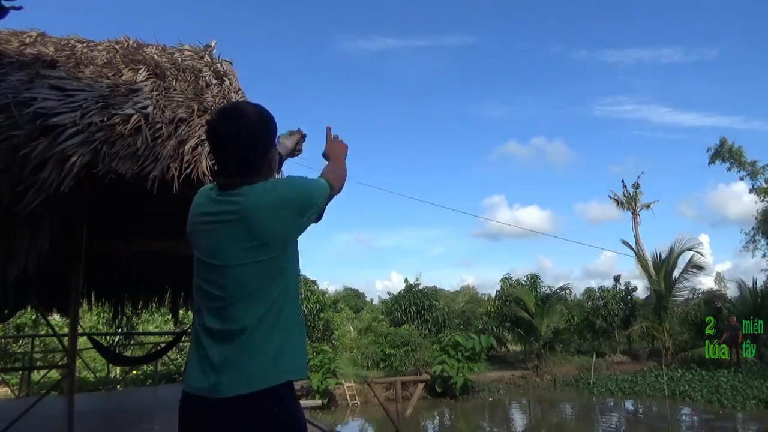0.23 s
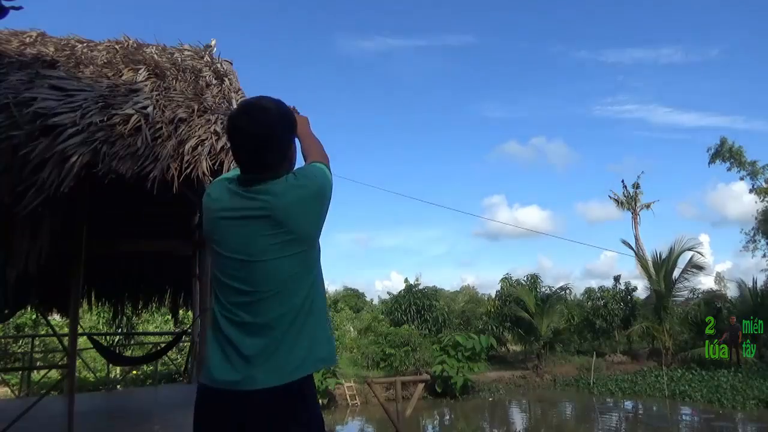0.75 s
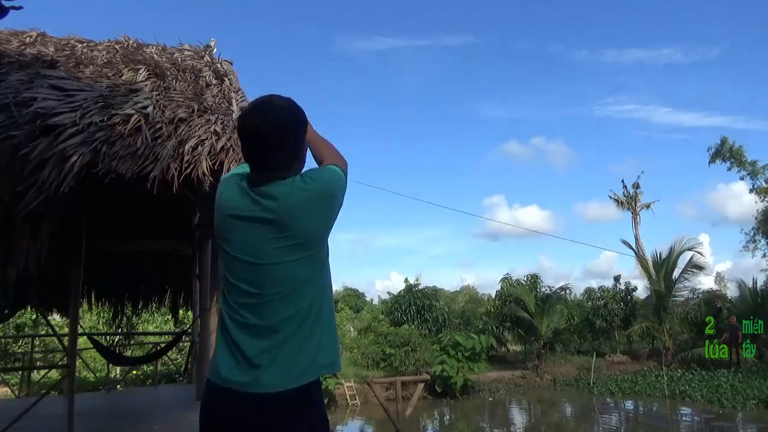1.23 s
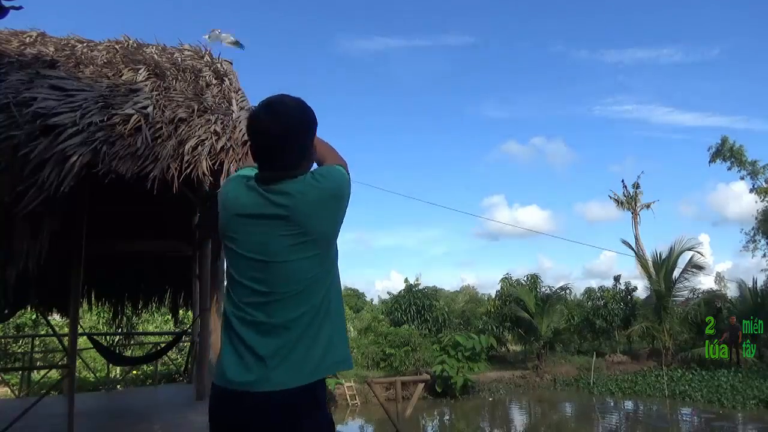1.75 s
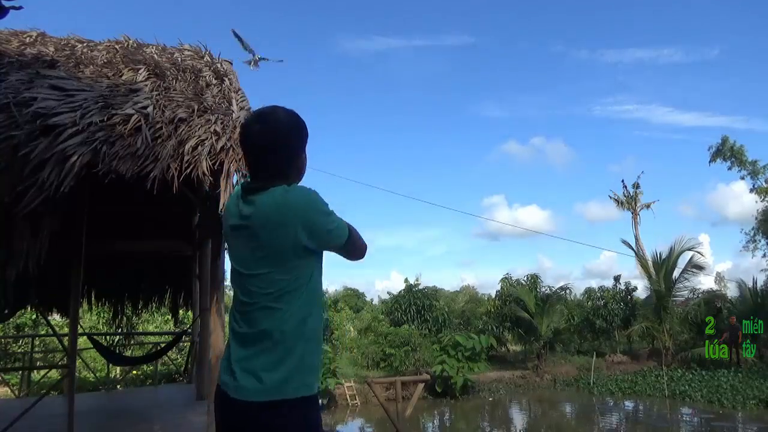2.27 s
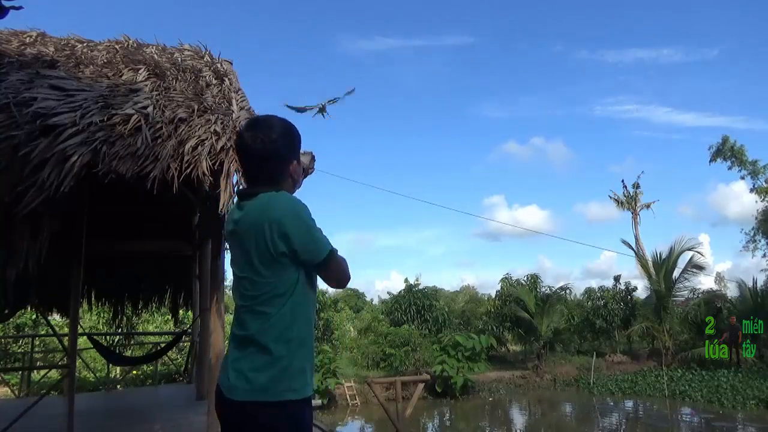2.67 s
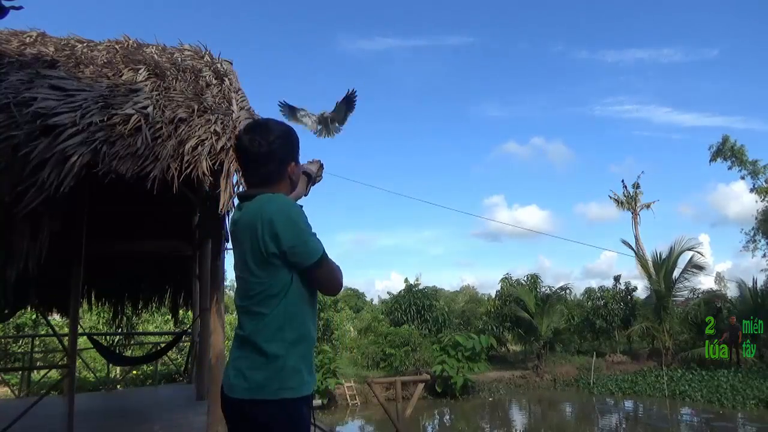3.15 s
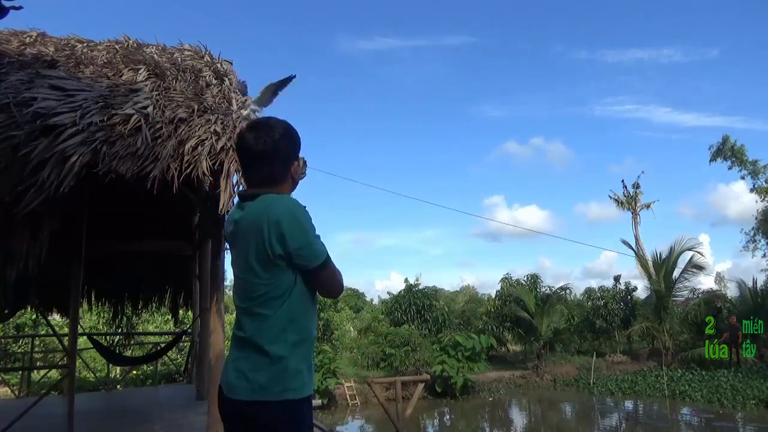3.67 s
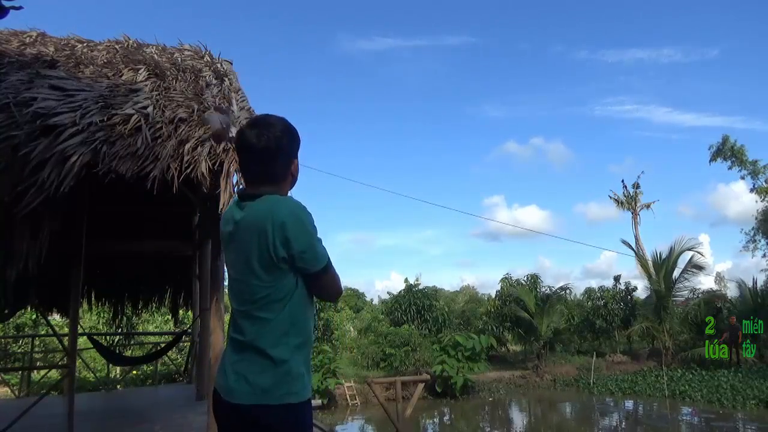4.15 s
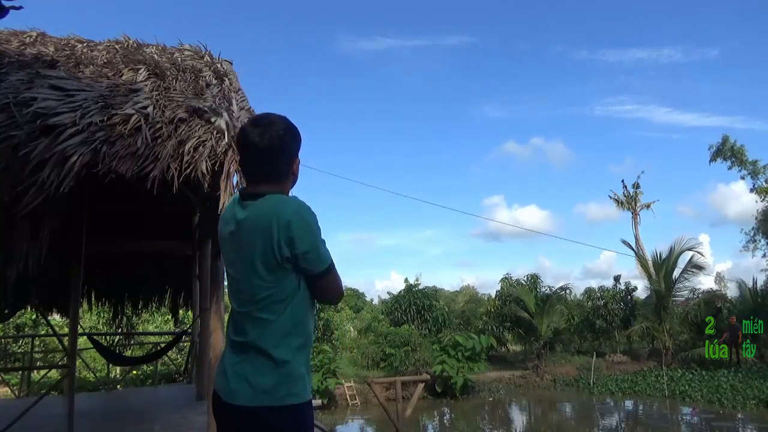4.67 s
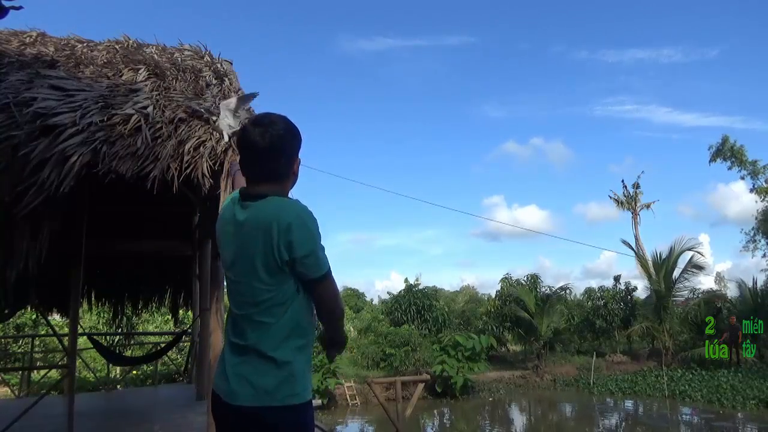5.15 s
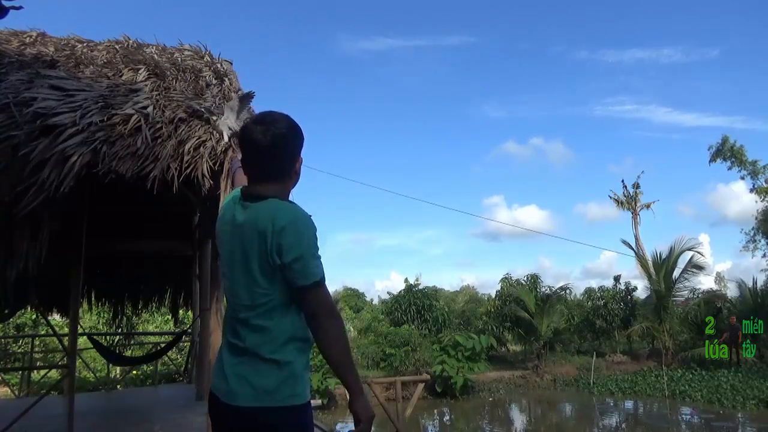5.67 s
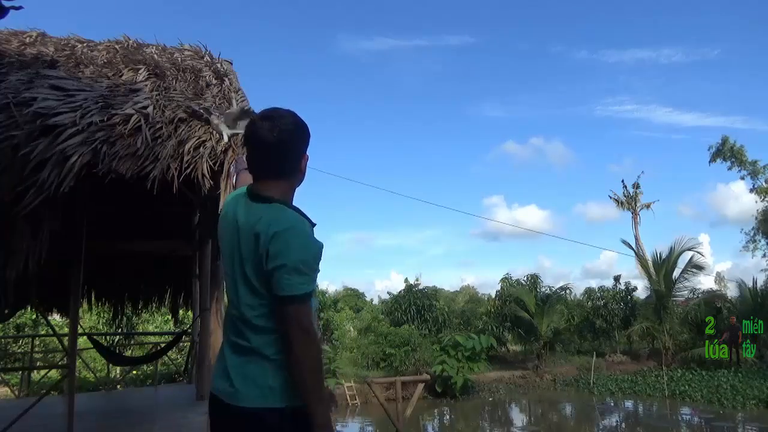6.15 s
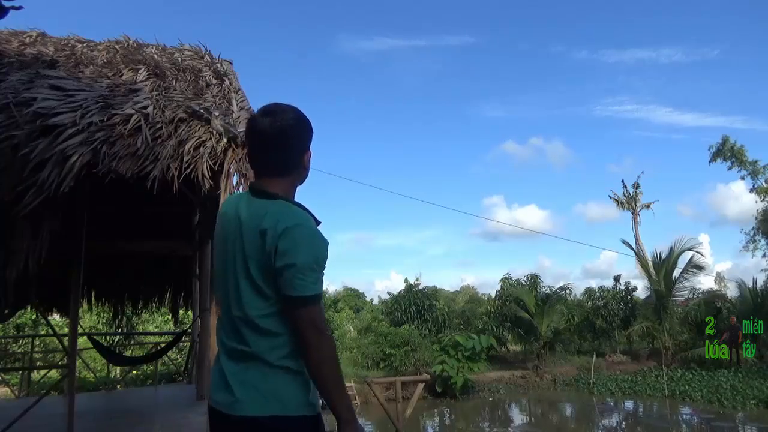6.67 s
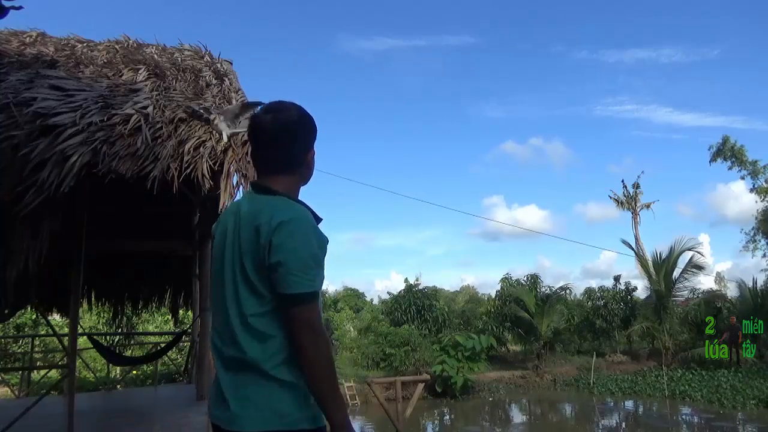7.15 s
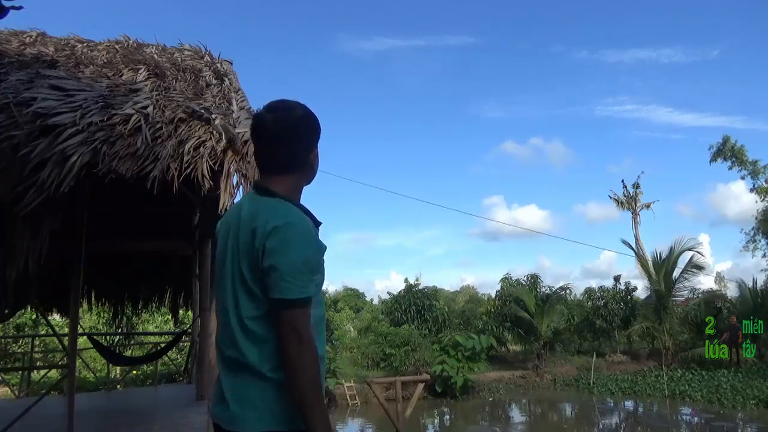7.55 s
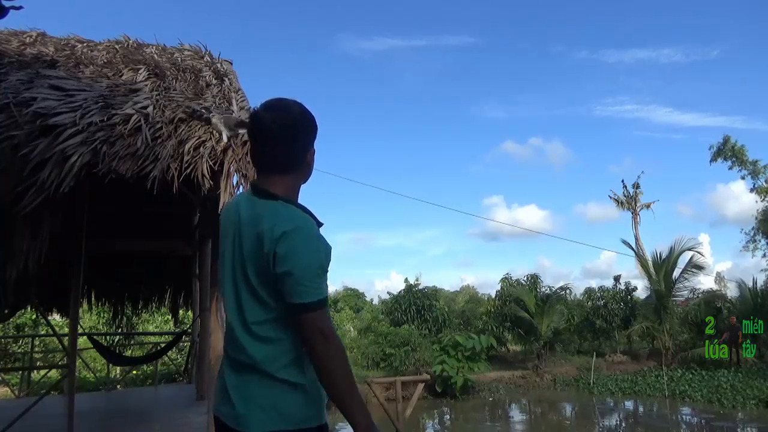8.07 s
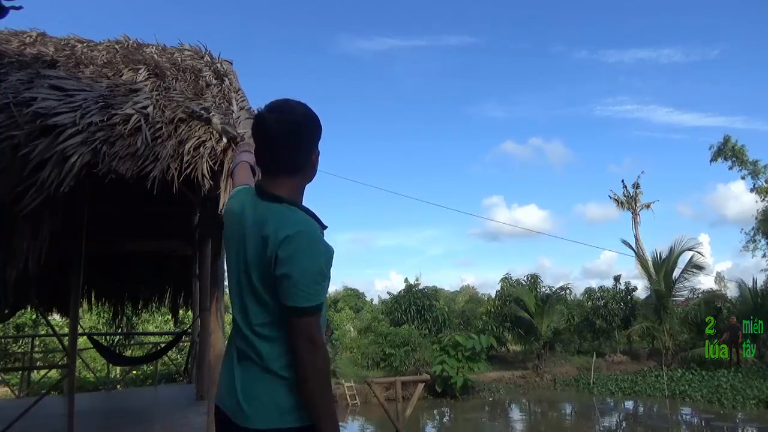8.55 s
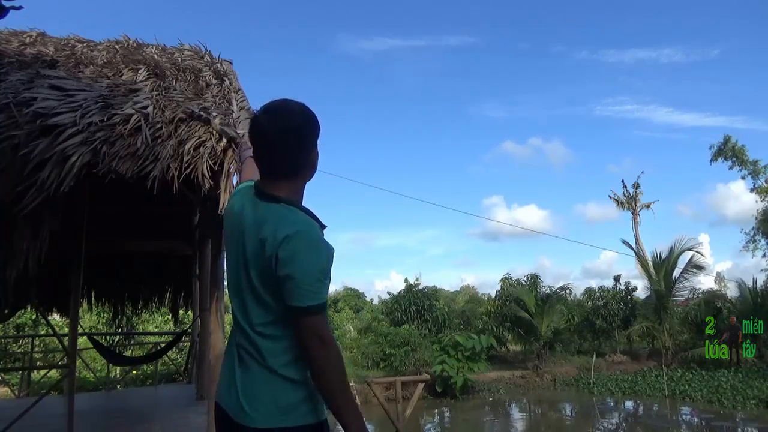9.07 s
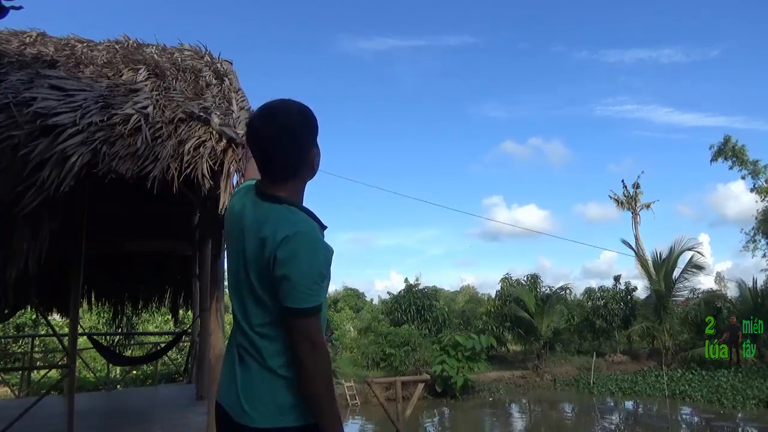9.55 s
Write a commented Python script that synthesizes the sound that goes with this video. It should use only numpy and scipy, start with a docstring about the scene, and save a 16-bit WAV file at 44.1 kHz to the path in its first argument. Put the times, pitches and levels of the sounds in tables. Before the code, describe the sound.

Two young falcons beg outdoors with long rasping screeches and hoarse rising wails, with short rising chirps in between.

```python
"""A harsh screech opens the scene. Two young falcons beg beside a thatched hut by a pond: one's rasping
screeches alternate with the other's hoarse rising wails. Both are turbulent air exciting throat
resonances; each cry scoops up and swells as the beak opens, holds, then bends away. Short rising
whistles, thin peeps and a few taps sound in between. Nearby surfaces and the trees echo them over
quiet open air and the drone of a far motor."""
import sys
import numpy as np
from scipy import signal
from scipy.fft import rfft, irfft, next_fast_len
from scipy.io import wavfile

SR = 44100
rng = np.random.default_rng(int(sys.argv[2]) if len(sys.argv) > 2 else 0)


def int16_out(signal):
    """Quantize to a 16-bit WAV file."""
    q = np.round(np.clip(np.atleast_2d(signal).T, -1, 1) * 32767)
    wavfile.write(sys.argv[1], SR, q.astype(np.int16))


N = 433062
TIME = np.arange(N) / SR


def undb(db):
    """Decibels to amplitude gain."""
    return 10 ** (np.asarray(db) / 20)


def unit(x):
    """Normalisation to rms 1."""
    return x / np.sqrt(np.mean(np.abs(x) ** 2))


def add(out, start, x):
    """Superposition: mix x into out from a start in seconds."""
    i = max(int(start * SR), 0)
    out[i:i + len(x)] += x[:max(len(out) - i, 0)]


def delayed(x, ms):
    """Propagation delay: the same sound, milliseconds later."""
    return np.concatenate([np.zeros(round(ms * SR / 1000)), x])[:len(x)]


def colour(x, points):
    """Spectral shaping by a (Hz, dB) outline."""
    hz, db = np.transpose(points)
    size = next_fast_len(len(x))
    bin_hz = np.maximum(np.fft.rfftfreq(size, 1 / SR), 1)
    gain = undb(np.interp(np.log(bin_hz), np.log(hz), db))
    return irfft(rfft(x, size) * gain, size)[:len(x)]


def flutter(n, hz, order=2):
    """Random fluctuation: complex noise of rms 1, low-passed at hz."""
    lead = SR // 20
    noise = rng.standard_normal((n + lead, 2)) @ np.array([1, 1j])
    lowpass = signal.butter(order, min(hz, SR / 3), fs=SR, output="sos")
    return unit(signal.sosfilt(lowpass, noise)[lead:])


def ring(n, hz, width, order=2):
    """Noise-driven resonance, steady or gliding; its real part has rms 1. Order steepens the skirts."""
    carrier = np.exp(2j * np.pi * np.cumsum(hz * np.ones(n)) / SR)
    return np.sqrt(2) * flutter(n, width / 2, order) * carrier


def sing(n, hz, width):
    """Saturation: a resonance on the edge of self-oscillation limits its swings and holds firmer."""
    swing = ring(n, hz, width)
    return np.sqrt(2) * unit(swing / np.sqrt(1 + np.abs(swing) ** 2))


def blend(tone, breath, share_db):
    """Incoherent addition: a tone and its noisy surround mix at constant power."""
    return (undb(share_db) * tone + breath) / np.sqrt(1 + undb(2 * share_db))


def rattle(n, hz, depth_db):
    """Amplitude modulation: membranes slap irregularly and chop the air stream."""
    return unit(undb(depth_db * flutter(n, hz).real))


# The spectrum of the open air. Each row: frequency in Hz, relative level in dB.
AIR_SPECTRUM = [(15, -33), (25, -12), (121, -13.5), (311, -12.5), (907, -16.5), (1230, -19), (1670, -16),
                (3870, -18.5), (4630, -24.5), (5970, -23), (7900, -27.5), (8970, -20), (11000, -36),
                (14300, -60), (22000, -120)]


def countryside():
    """Ambient noise: broadband air wavers in level over the narrow-band drone of a far motor."""
    mid, side = (unit(colour(rng.standard_normal(N), AIR_SPECTRUM)) for _ in range(2))
    drone = undb(-51) * ring(N, hz=110, width=59).real
    air_db = -50.5 + 3 * flutter(N, hz=6).real
    return undb(air_db) * (mid + undb(-6) * side * np.array([[1], [-1]])) + drone


def yard(x, wet_db, t60, echo_db):
    """Reverberation: hut and ground reflect a few echoes; trees scatter a different tail to each ear."""
    t = TIME[:SR // 2]
    early = sum(undb(echo_db - 6.4 * k) * delayed(x, ms) for k, ms in enumerate([17, 31, 46]))
    decay = undb(-60 * t / t60) * (1 + 3.8 * np.exp(-t / .0087)) * (t > .002)
    ears = []
    for _ in range(2):
        tail = unit(rng.standard_normal(len(t)) * decay) / np.sqrt(len(t))
        tail = colour(tail, [(200, 3.5), (4000, 1.5), (9000, 3.5), (15000, -46)])
        ears.append(x + early + undb(wet_db) * signal.fftconvolve(x, tail)[:N])
    return np.array(ears)


def reflect(x, near_ms, near, far_ms, far):
    """Comb filtering: reflections from two close surfaces interfere with the direct sound."""
    combed = x + near * delayed(x, near_ms) + far * delayed(x, far_ms)
    return combed / np.sqrt(1 + near ** 2 + far ** 2)


# Small taps. Each row: start in seconds, relative level in dB.
TAP_EVENTS = [(0.383, -19), (0.47, -27), (5.779, -34), (5.983, -34), (8.455, -31)]


def taps():
    """Heavy damping: dry little knocks die within milliseconds."""
    out, t = np.zeros(N), TIME[:SR // 20]
    for start, db in TAP_EVENTS:
        knock = ring(len(t), hz=2700, width=3400).real * np.exp(-t / .002)
        add(out, start, undb(db - 6) * knock)
    return out


def glide(length, first_hz, last_hz, waver, bend):
    """Frequency sweep: phase and envelope of a short note that swells, then stops quickly."""
    n = int(length * SR)
    progress = np.arange(n) / n
    hz = first_hz + (last_hz - first_hz) * progress ** bend
    hz *= 1 + waver * flutter(n, hz=160).real
    swell = np.sqrt(2) * np.sin(np.pi * progress ** 1.15) ** .75
    return 2 * np.pi * np.cumsum(hz) / SR, swell


# Thin hoarse notes, alone or inside a cry. Each row: start and length in seconds,
# first and last pitch in Hz, level in dB.
PEEP_NOTES = [(0.94, 0.91, 3524, 3510, -30.5), (2.27, .1, 3810, 3730, -31), (2.891, 0.028, 817, 745, -40),
              (2.944, 0.032, 1565, 1800, -43), (2.969, 0.039, 3130, 3280, -27),
              (3.02, 0.029, 3370, 3464, -21.5), (3.05, 0.086, 2096, 1914, -36),
              (3.151, 0.076, 3610, 3580, -26.5), (5.78, 0.098, 6500, 5750, -48.5),
              (5.901, 0.044, 2270, 2250, -38), (5.946, 0.025, 1750, 1660, -36.5),
              (8.319, 0.14, 5470, 5520, -50.5), (8.482, 0.047, 1550, 1540, -36),
              (8.522, 0.091, 1650, 2140, -37), (8.616, 0.136, 2278, 2325, -31.5),
              (8.624, 0.16, 4340, 4720, -35)]


def peeps():
    """Jitter and shimmer: random pitch and amplitude modulation roughen thin sine tones."""
    out = np.zeros(N)
    for start, length, first_hz, last_hz, db in PEEP_NOTES:
        phase, swell = glide(length, first_hz, last_hz, waver=.0245, bend=.9)
        add(out, start, undb(db) * swell * np.sin(phase) * rattle(len(phase), hz=120, depth_db=4.5))
    return out


# Rising whistles. Each row: start and length in seconds, first and last pitch in Hz, level in dB.
WHISTLE_NOTES = [(0.225, 0.086, 1872, 2161, -20.5), (0.491, 0.049, 1927, 2170, -29),
                 (0.617, 0.095, 2030, 2162, -22), (0.848, 0.0486, 1970, 2244, -20),
                 (1.818, 0.04, 1738, 2052, -16.5), (5.085, 0.096, 1595, 1960, -24.5),
                 (5.325, 0.064, 1573, 1950, -22), (5.478, 0.092, 1454, 2015, -25.5),
                 (5.661, 0.051, 1590, 1960, -24.5), (5.818, 0.029, 1790, 1993, -34.5),
                 (9.325, 0.055, 1700, 2017, -21), (9.473, 0.046, 1623, 1974, -21.5)]


def whistles():
    """Nearly simple harmonic motion: upward slurs with a trace of the second harmonic."""
    out = np.zeros(N)
    for start, length, first_hz, last_hz, db in WHISTLE_NOTES:
        phase, swell = glide(length, first_hz, last_hz, waver=.011, bend=.91)
        add(out, start, undb(db) * swell * (np.sin(phase) + undb(-36) * np.sin(2 * phase)))
    return out


def beak(length, first_hz, held_hz, last_hz, opening, closing):
    """Cavity tuning by the beak: time, how shut it still is (1 to 0), gliding pitch and a soft gate."""
    attack_s, release_s = .007, .0082
    t = TIME[:int(length * SR)]
    shut, ending = np.exp(-t / opening), np.exp((t - length) / closing)
    hz = held_hz + (first_hz - held_hz) * shut + (last_hz - held_hz) * ending
    gate = np.clip(np.minimum(t / attack_s, (length - t) / release_s), 0, 1)
    return t, shut, hz, gate


def arches(t, rows):
    """Superposed raised-cosine pulses, giving one curve for each height column."""
    return sum(np.outer(heights, np.cos(np.pi * np.clip((t - middle) / length, -.5, .5)) ** 2)
               for middle, length, *heights in rows)


# The birds press harder or ease off. Each row: middle and length in seconds,
# then gain, extra rasp and extra sizzle in dB.
BREATH_PUSHES = [(1.04, 0.49, -2, -1, -2.5), (2.01, 0.12, 1, 3, -1), (2.143, 0.11, -2, 0, -1),
                 (2.293, 0.093, 3, -2, -3), (2.642, 0.24, 4.5, 3.5, 8), (2.732, 0.044, 6.5, 8.5, 13.5),
                 (3.095, 0.087, -5, 3, -1), (3.235, 0.044, -3.5, 3, 4), (3.346, 0.51, 1.5, 0, 0.5),
                 (3.572, .14, 1, 0, 2.5), (3.78, 0.29, 0, 4.5, -6), (4.112, 0.34, -1.5, 2.5, 8),
                 (4.532, .12, 0.5, 5, 2), (5.262, 0.033, 5, -8, -13), (6.37, 0.12, 1.5, 4, -2),
                 (6.577, 0.14, -2, -4, -2), (6.797, 0.083, 3.5, 6, 2), (6.827, .05, -2.5, 5, 4),
                 (7.94, 0.23, 1.5, 0, -3), (8.732, 0.2, -5, 6, 1), (9.065, .3, 3, -0.5, 0),
                 (9.18, 0.072, -0.5, 11.5, 6)]
# The resonances bend for a moment, most of all in flight. Each row: middle and length in seconds,
# then the shifts of the throat, main and rasp resonances in octaves.
RESONANCE_BENDS = [(1.06, .14, -0.032, -.07, 0), (2.03, .12, 0.02, .06, -0.0036),
                   (2.227, .17, 0.24, 0.0017, 0), (2.315, .16, 0.23, -0.066, 0), (2.502, 0.19, .35, 0, 0),
                   (2.66, .13, 0.071, 0.081, 0.16), (2.737, 0.15, 0.28, -0.0072, 0.079),
                   (3.175, .17, .36, -0.0014, -0.014), (3.379, .16, -0.044, -0.057, 0.1),
                   (3.499, .12, 0, .04, 0.028), (3.782, .3, 0, 0, -.2), (4.001, .16, 0, 0.026, 0),
                   (4.42, .2, .16, -0.009, 0.015), (6.38, 0.22, -0.047, -0.031, -0.014),
                   (6.495, .15, 0.098, .05, 0.087), (7.7, .2, -.03, -0.042, 0),
                   (7.96, 0.31, 0.036, 0.0011, -0.26), (8.645, .14, .14, .05, -0.13),
                   (8.768, .1, 0.061, 0.054, 0.013), (8.87, .13, 0.054, -.06, -0.015),
                   (9.079, .24, -0.16, 0.051, 0.015)]


def articulation(t):
    """Slow modulation of a voice: changes of level, bends of the resonances and unsteady effort."""
    return arches(t, BREATH_PUSHES), arches(t, RESONANCE_BENDS), flutter(len(t), hz=12.17).real


# The throat and the rasp swell by these multiples of the main band's swell in dB.
SCREECH_THROAT_SWELL, WAIL_THROAT_SWELL, RASP_SWELL = .078, .88, 1.63

# One bird's wails. Each row: start and length in seconds; first, held and last pitch in Hz; opening and
# closing time constants in seconds; level and swell in dB; first and held throat frequency in Hz;
# throat and rasp in dB relative to the level; growth of rasp and sizzle in dB per second.
WAIL_CRIES = [(1.865, 0.889, 3680, 3982, 3853, 0.049, .04, -29, -0.5, 1995, 2140, -7, -7, -1),
              (2.94, 0.287, 3076, 3632, 3590, .08, 0.028, -25.5, 14.5, 1940, 2203, -8.5, -5, 4),
              (4.235, 0.31, 3700, 3694, 3623, 0.045, 0.039, -26, 2, 2340, 2394, -10, -13.5, 0),
              (5.274, 0.37, 3860, 3644, 3836, 0.029, 0.052, -26, 6, 2550, 2315, -10, -17.5, -6),
              (6.025, 0.808, 3010, 3970, 3736, 0.21, 0.074, -23.5, 19, 1593, 2666, -6.5, -18.5, -7),
              (8.002, 0.21, 4235, 4160, 3780, .05, 0.0201, -23.5, -1, 2107, 2165, -5.5, -6, -9),
              (8.488, 0.724, 2847, 3883, 3760, .13, 0.028, -25, 28, 1550, 2410, -7, -14, 10),
              (9.5, 0.33, 2326, 4030, 4120, 0.13, 0.035, -29.5, 7, 2330, 2420, -7, -17, -1)]
# The timbre of each wail. Each row: core width in Hz, core share in dB, throat width in Hz,
# sizzle in dB relative to the wail's rasp setting.
WAIL_TIMBRES = [(265, 0, 280, -8), (130, 0, 110, -7), (82, 3, 1330, -0.5), (102.7, 2.5, 510, -8),
                (173, 4, 135, -10), (220, -6.5, 350, -12.5), (150, -1, 240, -10), (142, 6, 220, -15)]


def wail(row, core_width, core_db, throat_width, sizzle_db):
    """Common modulation: beak half closed, a hoarse whistle and the throat resonance quaver together."""
    start, *shape, db, swell_db, throat_first_hz, throat_held_hz, throat_db, rasp_db, growth = row
    t, shut, hz, gate = beak(*shape)
    n, weak_db = len(t), -swell_db * shut
    (push_db, rough_db, bright_db), (throat_bend, main_bend, rasp_bend), effort = articulation(start + t)
    snap = 1 - .248 * np.exp((t - t[-1]) / .012)  # the resonances drop as the beak snaps shut
    hz = hz * 2 ** main_bend * snap
    throat_hz = (throat_held_hz + (throat_first_hz - throat_held_hz) * shut) * 2 ** throat_bend * snap
    quaver = 1 + .01453 * flutter(n, hz=21.4).real
    core = sing(n, hz * quaver, core_width)
    main = undb(weak_db) * blend(core, ring(n, 1.045 * hz, width=1120, order=3), core_db)
    tone = ring(n, throat_hz * quaver, throat_width)
    breath = ring(n, .94 * throat_hz, width=1090, order=3)
    throat = undb(throat_db + WAIL_THROAT_SWELL * weak_db) * blend(tone, breath, share_db=4.5)
    rasp = undb(rough_db + 1.5) * ring(n, 4950 * 2 ** rasp_bend, width=2400)
    sizzle = undb(sizzle_db + bright_db) * ring(n, 8800, width=2600)
    harsh = undb(rasp_db + RASP_SWELL * weak_db + growth * (t - t.mean())) * (rasp + sizzle)
    envelope = undb(db + push_db + 2.3 * effort) * gate
    return (main + throat + harsh).real * rattle(n, hz=218, depth_db=2) * envelope


# The near bird's screeches. Each row: start and length in seconds; first, held and last pitch in Hz;
# opening and closing time constants in seconds; level and swell in dB; throat, rasp and sizzle in dB
# relative to the level; growth of the sizzle in dB per second.
SCREECH_CRIES = [(0.0, 0.14, 4050, 4040, 3940, .01, 0.021, -23, -14, -2, 0.5, -8.5, 0),
                 (0.824, 1.03, 2245, 4067, 3730, 0.13, .025, -22, 14, -6.5, -1, -8, -8.5),
                 (3.222, 1.027, 2450, 4408, 3709, .135, .13, -20, 2.5, -8, -3, -11.5, 2),
                 (4.5, 0.78, 3096, 4247, 3990, .07, .06, -21.5, 15, -6, -0.5, -6.5, 10),
                 (6.821, 1.195, 3200, 3630, 3952, 0.19, .14, -21.5, 8.5, -10.5, -1, -9, 5.5)]
# The timbre of each screech. Each row: throat frequency and width in Hz, throat tone share in dB,
# its scoop time in seconds, core width in Hz, core share in dB, sizzle centre and main band width in Hz.
SCREECH_TIMBRES = [(2064, 320, 6, 0.00145, 44, -6, 9950, 1250),
                   (2052, 400, 4.5, 0.018, 98, -3.5, 10050, 1210),
                   (2160, 240, 1, 0.069, 190, -5, 9750, 1360), (2185, 46, 5, 0.015, 290, 1.5, 9400, 1170),
                   (1880, 170, 0.5, .04, 380, -1, 9400, 1260)]


def screech(row, throat_hz, throat_width, tone_db, scoop_s, core_width, core_db, sizzle_hz, main_width):
    """Broadband excitation: beak wide open, strong turbulence rings all resonances of the throat."""
    start, *shape, db, swell_db, throat_db, rasp_db, sizzle_db, growth = row
    onset_s, fade_s, fade_db = .0078, .068, -10
    t, shut, hz, gate = beak(*shape)
    n, weak_db = len(t), -swell_db * shut
    (push_db, rough_db, bright_db), (throat_bend, main_bend, rasp_bend), effort = articulation(start + t)
    hz = hz * 2 ** main_bend * (1 + .008 * effort)
    scoop = 1 - .25 * np.exp(-t / scoop_s)  # the lowest resonance rises as the beak opens
    tone_hz = throat_hz * scoop * 2 ** throat_bend * (1 + .01417 * effort)
    core = sing(n, hz, core_width)
    main = undb(weak_db) * blend(core, ring(n, .975 * hz, main_width), core_db)
    tone = sing(n, tone_hz, throat_width) * undb(fade_db * np.exp((t - t[-1]) / fade_s))
    breath = ring(n, 1.08 * throat_hz, width=1100)
    throat = undb(throat_db + SCREECH_THROAT_SWELL * weak_db) * blend(tone, breath, tone_db)
    rasp_hz = 5900 * 2 ** (rasp_bend - .25 * shut)  # starts a quarter octave low
    rasp = undb(-3) * ring(n, rasp_hz, width=1370, order=3) + undb(-11.5) * ring(n, 7000, width=1500)
    sizzle = undb(sizzle_db + bright_db + growth * (t - t.mean())) * ring(n, sizzle_hz, width=1430)
    harsh = undb(RASP_SWELL * weak_db) * (undb(rasp_db + rough_db) * rasp + sizzle)
    envelope = undb(db + push_db + .88 * effort) * gate * (1 - np.exp(-t / onset_s))
    return (main + throat + harsh).real * rattle(n, hz=466, depth_db=1.5) * envelope


# Close reflections of each screech. Each row: near delay in milliseconds, near gain,
# far delay in milliseconds, far gain.
SCREECH_REFLECTIONS = [(3.06, -.24, 5.19, .3), (3.06, -.2, 5.19, .28), (3.08, -.2, 5.1, 0),
                       (3.11, .3, 5.1, 0), (3.13, .42, 5.1, 0)]


def falcons():
    """Interference: close reflections colour one bird's screeches and the other's wails."""
    out = np.zeros(N)
    for row, timbre, reflections in zip(SCREECH_CRIES, SCREECH_TIMBRES, SCREECH_REFLECTIONS):
        add(out, row[0], reflect(screech(row, *timbre), *reflections))
    for row, timbre in zip(WAIL_CRIES, WAIL_TIMBRES):
        add(out, row[0], reflect(wail(row, *timbre), near_ms=3.11, near=-.08, far_ms=5.13, far=.22))
    return out


def scene():
    """Superposition: the birds, the taps and the more reverberant whistles sound over the open air."""
    pan = undb(np.array([[.35], [-.35]]))  # slightly left
    foreground = yard(peeps() + taps() + falcons(), wet_db=-11.5, t60=.48, echo_db=-12.5) * pan
    return foreground + yard(whistles(), wet_db=-4, t60=.45, echo_db=-7) + countryside()


def record(dry):
    """Saturation and aliasing: peaks round off; dropped samples add faint images every 3.9 kHz."""
    ceiling, inner_rate = .6, 48000
    band_limit = signal.ellip(10, .2, 60, 11050, fs=SR, output="sos")
    top_cut = signal.ellip(10, .2, 70, 15850, fs=SR, output="sos")
    rounded = dry / (1 + (dry / ceiling) ** 6) ** (1 / 6)
    upsampled = signal.resample_poly(signal.sosfilt(band_limit, rounded), inner_rate, SR, axis=1)
    aliased = upsampled[:, np.arange(N) * inner_rate // SR]
    hiss = undb(-76) * rng.standard_normal(N)
    return signal.sosfilt(top_cut, aliased + hiss)


dry = scene()
out = record(dry)
int16_out(out)
```